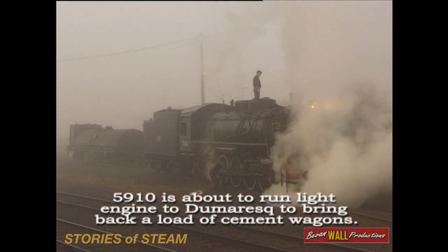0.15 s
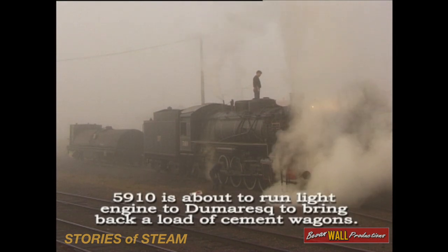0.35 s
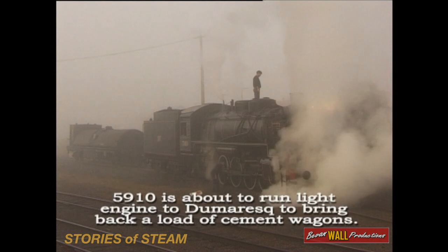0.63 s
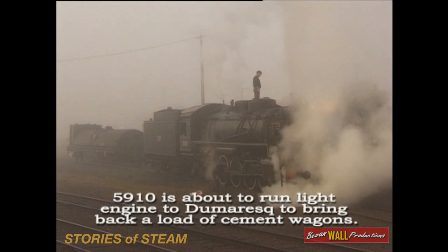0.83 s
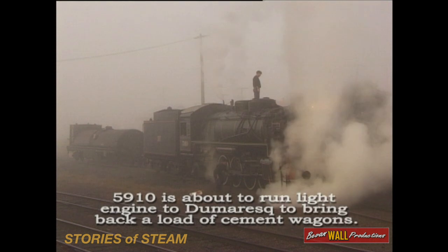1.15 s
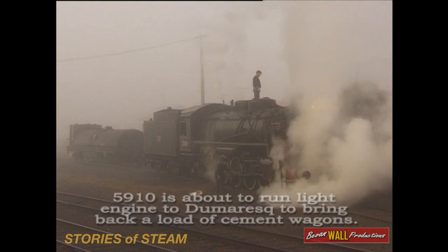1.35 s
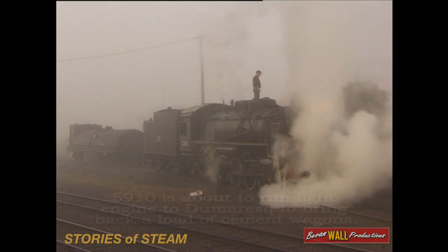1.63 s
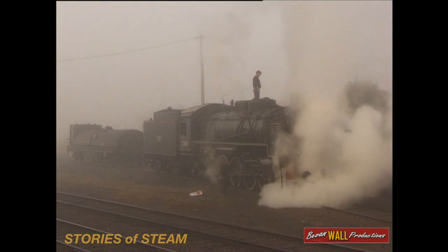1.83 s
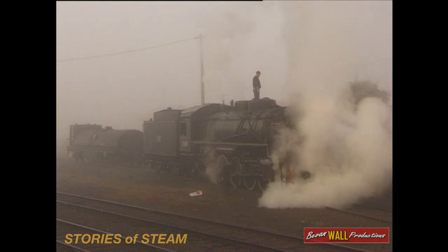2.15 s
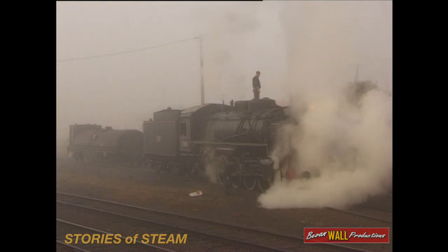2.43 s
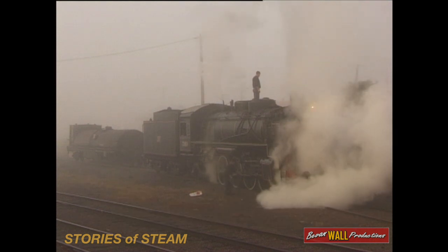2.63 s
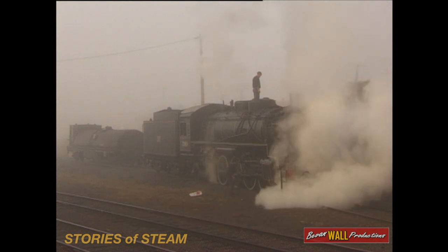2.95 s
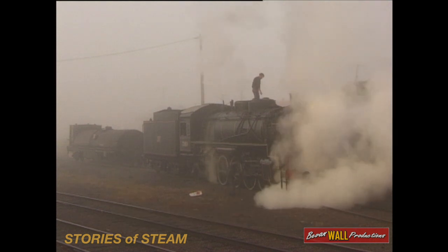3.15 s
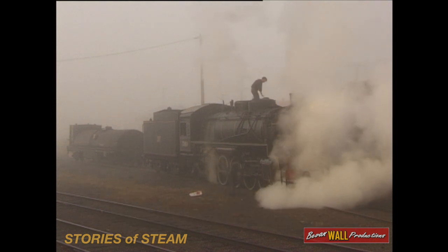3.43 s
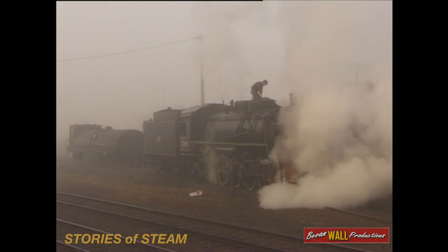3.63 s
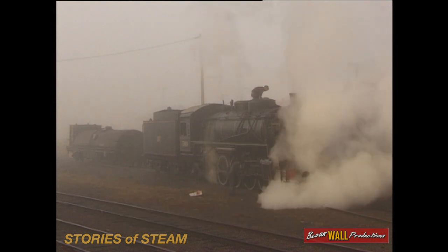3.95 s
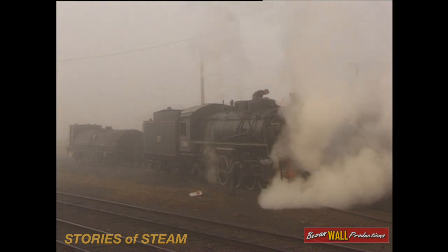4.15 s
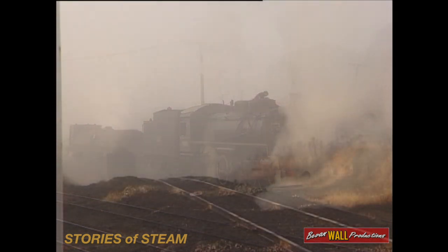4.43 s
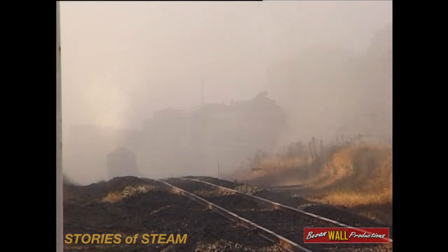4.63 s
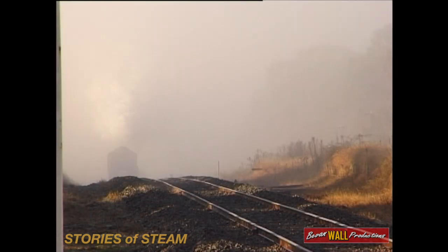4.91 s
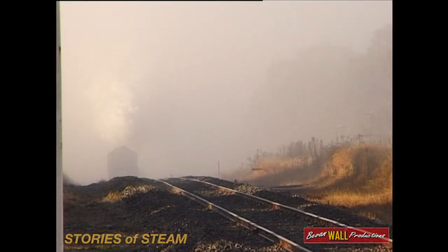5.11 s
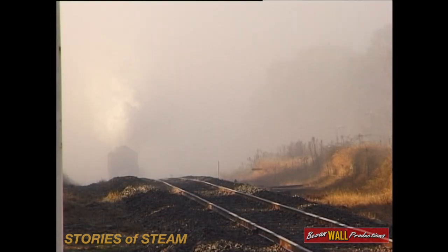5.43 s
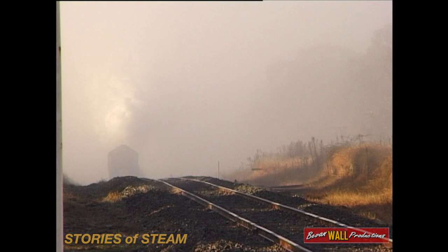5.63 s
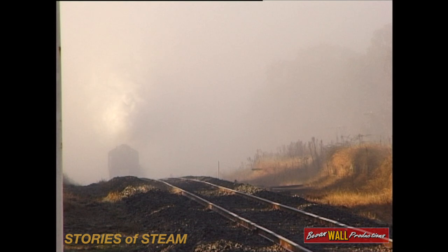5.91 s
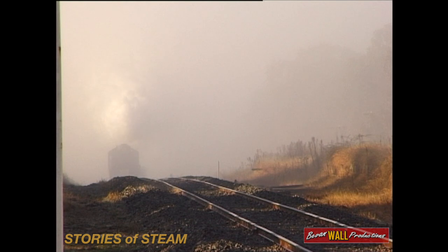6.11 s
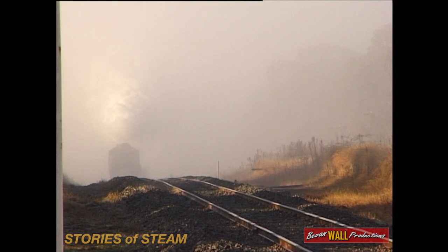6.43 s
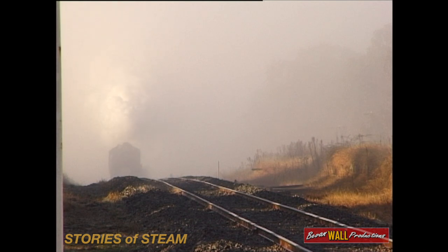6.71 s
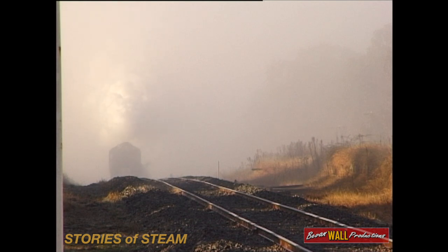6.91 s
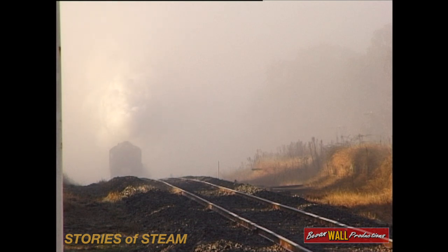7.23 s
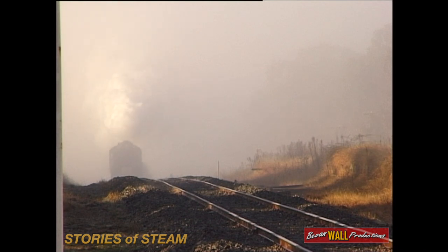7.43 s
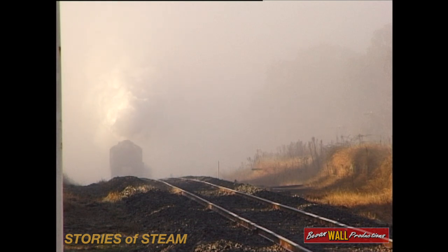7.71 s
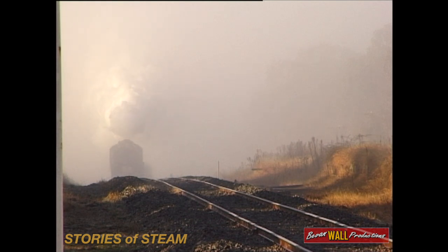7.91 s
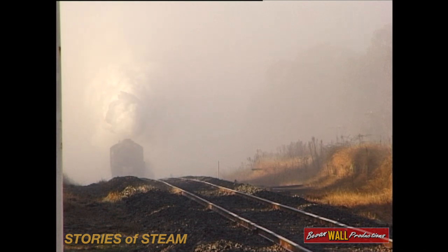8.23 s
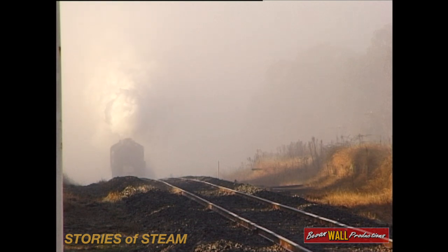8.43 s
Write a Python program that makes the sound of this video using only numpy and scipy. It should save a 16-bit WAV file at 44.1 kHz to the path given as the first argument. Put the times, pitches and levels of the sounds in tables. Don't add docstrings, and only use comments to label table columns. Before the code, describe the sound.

Outdoors, close to a standing steam locomotive: bright, wide hissing swells about once a second over a low fluttering fire roar and faint steady metallic singing. Two soft low knocks come as it begins fading. A much quieter distant scene replaces it: rapid soft exhaust puffs, rolling wheels, low road rumble, a lorry revving, changing gear and droning away, rails starting to ring. Stereo microphone, slight hiss.

```python
import sys
import numpy as np
from scipy import signal
from scipy.fft import rfft, irfft, next_fast_len
from scipy.io import wavfile
from scipy.ndimage import uniform_filter1d, map_coordinates

SR = 44100
rng = np.random.default_rng(int(sys.argv[2]) if len(sys.argv) > 2 else 0)


def log_audio(samples):
    frames = np.atleast_2d(samples).T
    limited = np.clip(frames, -1, 1)
    pcm = np.round(limited * 32767).astype(np.int16)
    wavfile.write(sys.argv[1], SR, pcm)


def amplitude_ratio(level_db):
    exponent = np.asarray(level_db, float) / 20
    return 10 ** exponent


N = 377496


def unit(x):
    return x / np.sqrt(np.mean(x ** 2) + 1e-20)


def seconds():
    return np.arange(N) / SR


def ramp(start_s, end_s):
    return np.clip((seconds() - start_s) / (end_s - start_s), 0, 1)


def curves(rows):
    s, *columns = np.transpose(rows)
    return [np.interp(seconds(), s, column, left=-140, right=-140) for column in columns]


def swells(rows):
    t = np.arange(0, N, 64) / SR
    level_db = sum(db * np.exp(-((t - s) / half_s) ** 2) for s, db, half_s in rows)
    return np.repeat(level_db, 64)[:N]


def wobble(rate_hz):
    coarse = np.arange(0, N + 32, 32)
    knots = rng.standard_normal(int(N * rate_hz / SR) + 4)
    return np.interp(np.arange(N), coarse, map_coordinates(knots, [coarse * rate_hz / SR]))


def tone(hz, width_hz, blur):
    turns = np.cumsum(np.broadcast_to(hz, N)) / SR + rng.random()
    carrier = np.exp(2j * np.pi * turns)
    share = np.clip(blur, 0, 1)
    noise = unit(wobble(width_hz)) + 1j * unit(wobble(width_hz))
    return np.real(carrier * (np.sqrt(2 - 2 * share) + np.sqrt(share) * noise))


def ports(pair, table, spectrum=((1, 0),)):
    size = next_fast_len(N + 8192)
    log_hz = np.log(np.fft.rfftfreq(size, 1 / SR) + 1)

    def along(rows):
        hz, *columns = np.transpose(rows)
        return [np.interp(log_hz, np.log(hz + 1), column) for column in columns]

    alike, lead_rad, balance_db = along(table)
    turn_rad = np.arccos(np.clip(alike, 0, 1)) / 2
    coloured = rfft(pair, size) * amplitude_ratio(along(spectrum)[0])
    mid, side = coloured * [np.cos(turn_rad), np.sin(turn_rad)]
    skew = amplitude_ratio(balance_db / 2) * np.exp(.5j * lead_rad)
    return irfft(np.array([(mid + side) * skew, (mid - side) / skew]), size)[:, :N]


def rush(spectrum, table, patchy_db, streaky_db=0, ridges=()):
    hz, _, z = signal.stft(rng.standard_normal((2, N)), SR, nperseg=512)

    def field(bins, frames):
        smooth = uniform_filter1d(rng.standard_normal(z.shape[1:]), bins, axis=0)
        return unit(uniform_filter1d(smooth, frames, axis=1))

    gain_db = patchy_db * field(6, 12) + streaky_db * field(2, 60)
    for centre_hz, width_hz, db in ridges:
        drift = 1 + .3 * np.resize(wobble(2.5)[::256], z.shape[-1])
        gain_db += db * drift / (1 + ((hz[:, None] - centre_hz) / width_hz) ** 2)
    pair = signal.istft(z * amplitude_ratio(gain_db), nperseg=512)[1][:, :N]
    return unit(ports(pair, table, spectrum))


# (frequency [Hz], density [dB per Hz])
HISS = [(200, -9), (3000, -6), (6000, 5), (9000, -0.5), (12500, -8.5), (13800, -3), (14600, -6.5),
        (15500, -62.5)]
# (frequency [Hz], level [dB rms])
DRUM = [(2400, -78), (2700, -75), (3000, -78), (3670, -79), (4050, -74), (4500, -81), (4800, -80),
        (5023, -85), (6000, -96), (6300, -95), (6600, -89), (6900, -95), (8080, -95), (9000, -98),
        (9300, -97)]


def camera():
    whine = sum(amplitude_ratio(db) * tone(hz, width_hz=2, blur=.05) for hz, db in DRUM)
    return amplitude_ratio(-73) * rush(HISS, [(1, 0, 0, 0)], patchy_db=0.0) + whine


# (frequency [Hz], likeness [0-1], left lead [rad], left over right [dB])
FAR_PORTS = [(39.3, 0.9, .4, 0), (250, 0.84, .1, 0.5), (600, 0.68, -0.57, -1), (1400, 0.47, -0.67, -5),
             (3000, 0.35, -.4, -1), (5060, 0.49, 0, 2), (7000, 0.074, 0, 0.5)]
# (frequency [Hz], density [dB per Hz])
ROAD = [(12, -40), (20, -10), (40, -2), (65, 1), (105, 0), (125, -3.5), (160, -7), (200, -10.5), (260, -20),
        (330, -35), (450, -49)]


def road():
    lumps_db = 1.1 * wobble(12)
    return amplitude_ratio(-45 + lumps_db) * rush(ROAD, FAR_PORTS, patchy_db=1.8)


# (frequency [Hz], level [dB rms], width [Hz], onset [s])
RAILS = [(720, -59, 20, 8.05), (958, -59, 12, 7.0), (1082, -60, 8, 7.05), (1260, -65, 25, 6.0),
         (1425, -67, 20, 6.2)]


def rails():
    def ringing():
        return sum(amplitude_ratio(db) * np.clip((seconds() - onset_s) / .25, 0, 1) * tone(hz, width_hz, blur=.6)
                   for hz, db, width_hz, onset_s in RAILS)

    return ports(np.array([ringing(), ringing()]), FAR_PORTS)


# (time [s], peak [dB])
THUMPS = [
    (3.268, -24),
    (3.44, -23),
]


def thumps():
    ring_hz, t60_s, rise_s = 95, .16, .012
    s, peak_db = np.transpose(THUMPS)
    t = np.clip(seconds() - s[:, None], 0, None)
    ring = np.sin(2 * np.pi * ring_hz * t) * (1 - np.exp(-t / rise_s)) * amplitude_ratio(-60 * t / t60_s)
    return amplitude_ratio(peak_db) @ ring


# (time [s], firing rate [Hz], load level [dB])
LORRY = [
    (5.2, 100.4, -70),
    (5.3, 106, -59.5),
    (5.47, 112.1, -68),
    (5.51, 113.3, -45.5),
    (5.581, 125, -45.5),
    (6.0, 125.1, -45),
    (6.6, 128.6, -45),
    (7.2, 133.7, -47),
    (8.56, 142.8, -49),
]
# (order [per turn], level over the octave [dB])
SHAFT = [(5, -13), (7, -21), (9, -16.5), (10, -14), (13, -10.5), (16, -13), (20, -20), (23, -20),
         (26, -19.5)]


def lorry():
    shade_start_s, shade_end_s, shade_db, recede_db_per_s = 6.65, 7.3, -10.5, 1
    octave_offset_db, idle_octave_db = -3, -12
    firing_hz, firing_db = curves(LORRY)
    shaft_hz = np.abs(firing_hz) / 3
    away_db = shade_db * ramp(shade_start_s, shade_end_s)
    away_db -= recede_db_per_s * np.clip(seconds() - shade_end_s, 0, None)
    idle = 1 - ramp(*np.transpose(LORRY)[0][2:4])
    octave_db = firing_db + octave_offset_db + idle_octave_db * idle + away_db
    upper_db = 0.63 * octave_db - 16.5

    def order(k, db, blur):
        return amplitude_ratio(db) * tone(k * shaft_hz, width_hz=2.2 * k, blur=blur)

    firing = order(3, firing_db + .6 * wobble(5), .02) + order(6, octave_db, .02)
    drone = [sum(order(k, upper_db + db, blur=.9) for k, db in SHAFT) for _ in "ab"]
    drone[0] += firing
    return ports(np.array(drone), FAR_PORTS)


# (time of sharp beat [s], sharp beat [dB], beat before it [dB])
TURNS = [(5.111, -47, -49), (5.423, -47, -49), (5.731, -49, -48), (6.054, -48, -54), (6.36, -47, -52),
         (6.669, -49, -49), (6.987, -45.5, -51), (7.289, -48, -50), (7.612, -48, -53),
         (7.912, -50.5, -47.5), (8.216, -48, -49), (8.531, -47, -49)]
# (time from sharp beat [s], low [dB], middle [dB], top [dB])
VALVE = [
    (-.238, -9, -14.5, -13),
    (-.15, -2.5, -27, -15),
    (-.073, 0, -2, -7.5),
    (0, 0, -1.5, -7),
]


def exhaust_beats():
    scatter_db, brighten_db_per_s = 1.3, 2.5
    s, sharp_db, lead_db = np.transpose(TURNS)
    soft_db = (sharp_db + lead_db) / 2
    offset_s, *part_db = np.transpose(VALVE)
    when_s = (s[:, None] + offset_s).ravel()
    effort_db = np.array([soft_db, soft_db, lead_db, sharp_db]).T.ravel()
    level_db = effort_db + np.tile(part_db, len(s))
    level_db[-1] += brighten_db_per_s * (when_s - 7)
    return when_s, level_db + scatter_db * rng.standard_normal(level_db.T.shape).T


# (frequency [Hz], density [dB per Hz])
PUFFS = [
    [(150, -70), (250, -39), (500, -3.5), (1000, 4.5), (1400, 2), (1900, -36.5), (3000, -90)],
    [(500, -90), (900, -25), (1300, -4.5), (2400, -6), (3200, -33), (5000, -90)],
    [(1200, -90), (1900, -30), (2600, 1), (3600, -4.5), (5000, -16), (6300, -31), (8000, -90)],
]


def exhaust():
    when_s, part_db = exhaust_beats()
    kicks = np.zeros((3, N))
    kicks[:, (when_s * SR).astype(int)] = amplitude_ratio(part_db)
    rise = round(.0095 * SR)
    t = np.arange(SR // 4) / rise
    shape = (t / 2) ** 2 * np.exp(2 - t)
    pants = np.abs(signal.fftconvolve(kicks, shape[None], axes=1)[:, 2 * rise:N + 2 * rise])
    return amplitude_ratio(1.0) * sum(pant * rush(colour, FAR_PORTS, patchy_db=1.5) for pant, colour in zip(pants, PUFFS))


# (frequency [Hz], density [dB per Hz])
LEAK = [(3500, -60), (4300, -10), (4700, -7), (5100, -1), (5500, -8), (5900, -15), (6500, -50)]
# (frequency [Hz], density [dB per Hz])
ROLLING = [(150, -29), (250, -3), (321, -5.5), (450, -3), (700, -3.5), (970, -3), (1260, -3), (1900, -8.5),
           (2670, -13.5), (3840, -20), (5100, -27), (5600, -36), (6300, -38), (8000, -64)]


def far_engine():
    nearing_db = 2.6 * (seconds() - 7)
    leak = amplitude_ratio(nearing_db - 68.5) * rush(LEAK, FAR_PORTS, patchy_db=2.0)
    rolling = amplitude_ratio(-46 + 0.17 * nearing_db) * rush(ROLLING, FAR_PORTS, patchy_db=.6, streaky_db=1.1)
    return leak + exhaust() + rolling


# (frequency [Hz], likeness [0-1], left lead [rad], left over right [dB])
NEAR_PORTS = [(39.74, 0.59, .7, 3), (130, 0.953, .8, 1), (300, .8, .5, 2.5), (599, .92, .1, 1),
              (1520, 0.69, -0.14, 0), (3000, 0.88, -0.25, 0), (4000, 0.67, -0.15, 0),
              (6000, 0.85, -0.47, -1), (12000, 0.75, -0.56, -1.5)]
# (frequency [Hz], density [dB per Hz])
FIRE = [(12, -53.5), (20, -21.5), (32, -19), (53, -9.5), (75, -3.5), (97, 4), (135, -4), (166, -4),
        (193, -12), (249, -6.5), (302, -19), (389, -7), (420, -8.5), (550, -47), (920, -120)]
# (time [s], level [dB], half width [s])
FLARES = [
    (.17, 1, .05),
    (.55, 6.5, 0.047),
    (1.0, 2.5, 0.11),
    (1.63, 5, 0.039),
    (1.95, -0.5, .1),
    (2.24, 3, 0.042),
    (3.2, 0.5, .4),
    (4.45, 2, .1),
]


def fire(blower_db):
    level_db = blower_db - 8 + swells(FLARES) + 0.67 * wobble(9)
    return amplitude_ratio(level_db) * rush(FIRE, NEAR_PORTS, patchy_db=0.57)


# (frequency [Hz], density [dB per Hz])
BLOWER = [(160, -40.5), (280, -11.5), (439, -15.5), (489, -5.5), (554, -10), (618, -11), (670, -8),
          (869, -3), (934, -7), (1010, -2.5), (1110, -7), (1200, -0.5), (1450, -9.5), (1970, -8),
          (2400, -7), (3120, -32), (5280, -120)]


def blower(blower_db):
    return amplitude_ratio(blower_db - .5) * rush(BLOWER, NEAR_PORTS, patchy_db=.5, streaky_db=.6)


# (frequency [Hz], level over the blower [dB], width [Hz])
SINGING = [(33.6, -29, 2), (87, -13, 4), (165.5, -22, 5), (259.6, -24, 6), (482, -22, 9), (613.7, -12.5, 1),
           (631.2, -13.5, 1), (751, -21, 6), (995, -16, 12), (1325, -21, 7), (1370, -21, 4)]
# (order [per turn], level over the blower [dB])
GENERATOR = [(1, -12), (9, -16), (10, -20), (18, -19), (40, -11)]


def pipes_and_generator(blower_db):
    generator_hz = 68.91
    notes = SINGING + [(k * generator_hz, db, 1) for k, db in GENERATOR]

    def singing():
        return sum(amplitude_ratio(db) * tone(hz, width_hz=3 * wide_hz, blur=wide_hz / 8) for hz, db, wide_hz in notes)

    return amplitude_ratio(blower_db) * ports(np.array([singing(), singing()]), NEAR_PORTS)


# (frequency [Hz], density [dB per Hz])
JET = [(2800, -50.5), (3500, -13), (4040, -6.5), (4600, -0.5), (5050, -0.5), (5600, -2.5), (6180, -1.5),
       (7200, -7.5), (9000, -23), (11700, -31), (19800, -120)]
# (frequency [Hz], density [dB per Hz])
COCK = [(1000, -41), (1700, -12), (2010, -7), (2300, -13), (2600, -4.5), (2900, -2), (3300, 0.5),
        (3800, -6), (4300, -9), (5000, -47.5)]
# (frequency [Hz], density [dB per Hz])
FIZZ = [(4410, -27.5), (7500, -5.5), (8680, -3), (12200, -14), (13900, -20.5), (14700, -35)]
# (frequency [Hz], density [dB per Hz])
NOZZLE = [(4100, -60), (4600, -8), (4950, 0), (5200, -3), (5600, -60)]
# (frequency [Hz], width [Hz], level [dB])
RIDGES = [(2507, 80, 0), (3080, 200, 1.5), (3217, 120, -4.5), (3490, 80, -2), (4460, 59, 0.5),
          (5070, 90, 4), (4980, 91, -3), (5600, 76, -0.5), (6140, 94, -2.5), (6622, 120, -0.5),
          (7640, 420, 4.5), (8650, 150, -1.5), (8660, 150, 4), (9790, 150, 2), (10200, 170, 1.5)]
# (time [s], level [dB], half width [s])
SURGES = [(0, -2, 0.44), (.36, 4, 0.22), (.78, 1.5, 0.13), (1.4, 3.5, 0.24), (1.7, 1, 0.029),
          (2.28, 5.5, 0.21), (3.05, 2.5, 0.2), (3.42, 4, 0.15), (3.66, 2.5, 0.2), (4.15, 2.5, 0.098),
          (4.7, 0.5, 0.073)]


def drain_cocks():
    def hiss(level_db, colour, patchy_db, streaky_db):
        return amplitude_ratio(level_db) * rush(colour, NEAR_PORTS, patchy_db, streaky_db, RIDGES)

    surge_db = swells(SURGES)
    flutter = amplitude_ratio(0.29 * wobble(14) + 0.35 * wobble(60))
    jet = hiss(-25.5 + surge_db, JET, patchy_db=0.8, streaky_db=1.37)
    cock = hiss(-28.5 + 0.53 * surge_db, COCK, patchy_db=0.3, streaky_db=2.16)
    fizz = hiss(-31 + surge_db, FIZZ, patchy_db=1.35, streaky_db=0.4)
    nozzle = amplitude_ratio(-36 + surge_db) * rush(NOZZLE, NEAR_PORTS, patchy_db=1.0, streaky_db=1.0)
    nozzle = nozzle * (1 - ramp(2.2, 3.2))
    return flutter * (jet + nozzle + cock + fizz)


def standing_engine():
    blower_db = -31.5 - 0.46 * seconds()
    return fire(blower_db) + blower(blower_db) + pipes_and_generator(blower_db) + drain_cocks()


def scene():
    far = ramp(4.58, 6.04) * (camera() + road() + far_engine()) + rails() + lorry()
    near = (1 - ramp(2.75, 4.823)) * (thumps() + standing_engine())
    return near + far


def roll_off(x):
    return signal.sosfilt(signal.butter(12, 14850, fs=SR, output="sos"), x)


def record(dry):
    return roll_off(dry)


dry = scene()
out = record(dry)
log_audio(out)
```